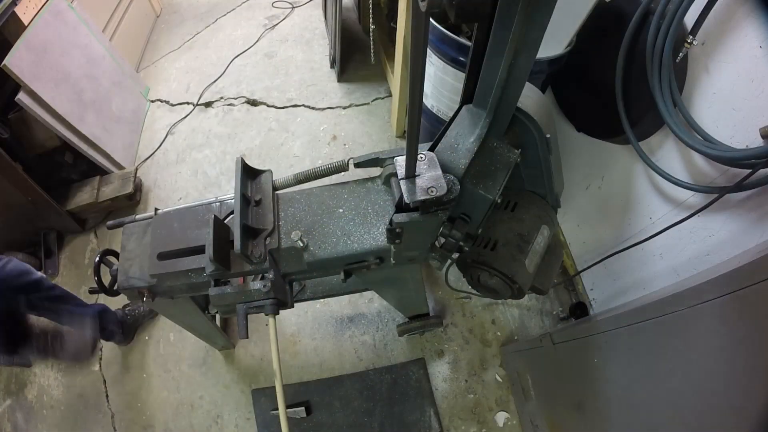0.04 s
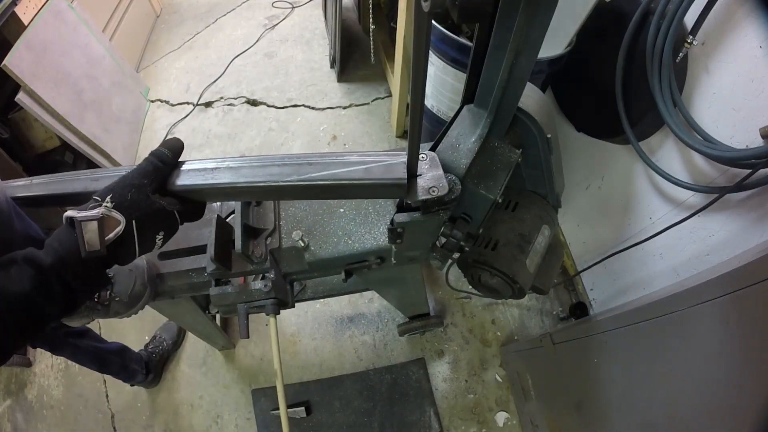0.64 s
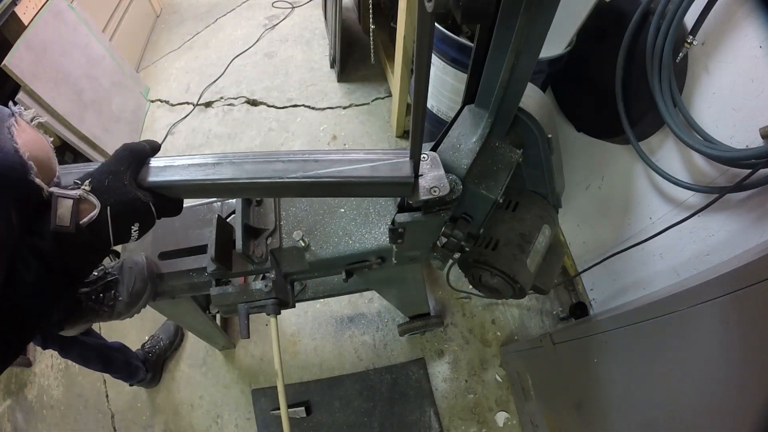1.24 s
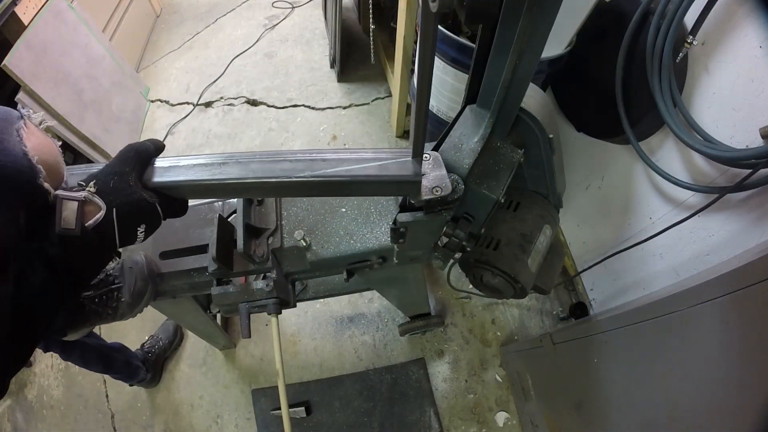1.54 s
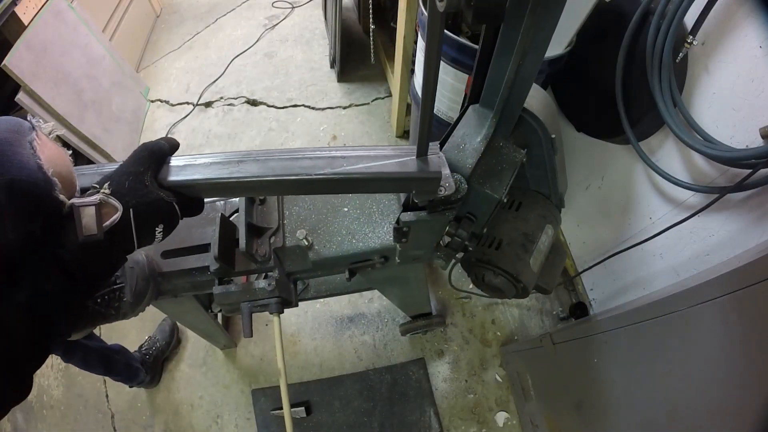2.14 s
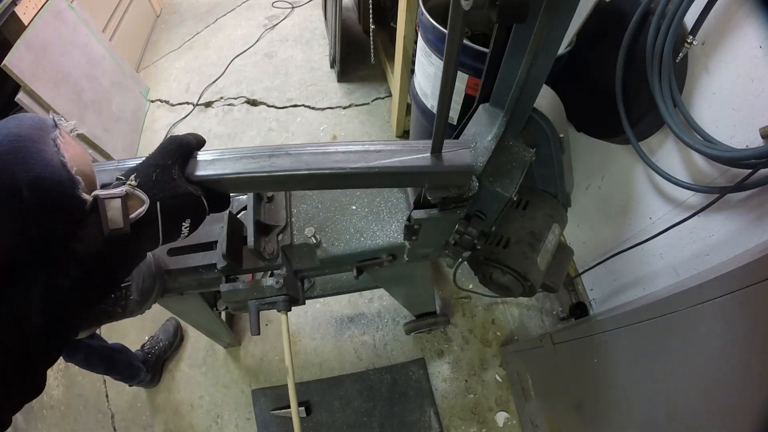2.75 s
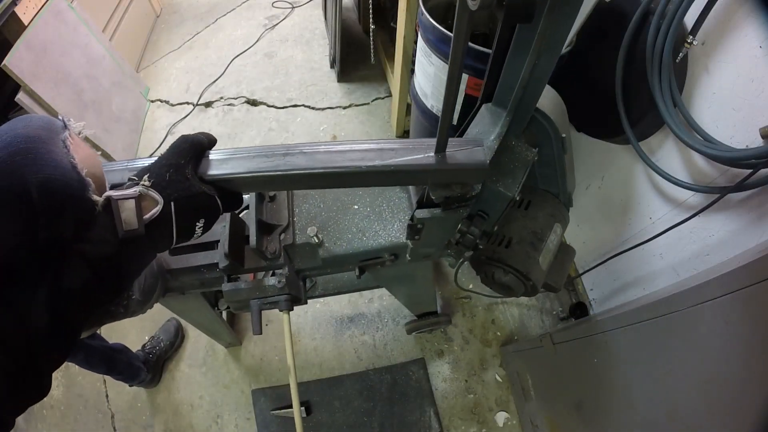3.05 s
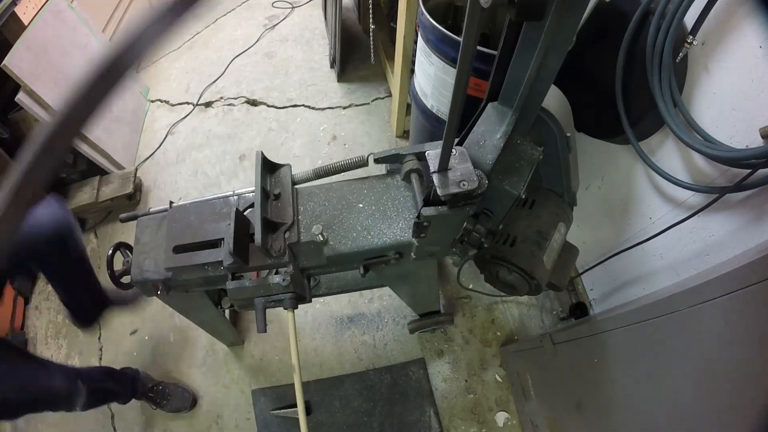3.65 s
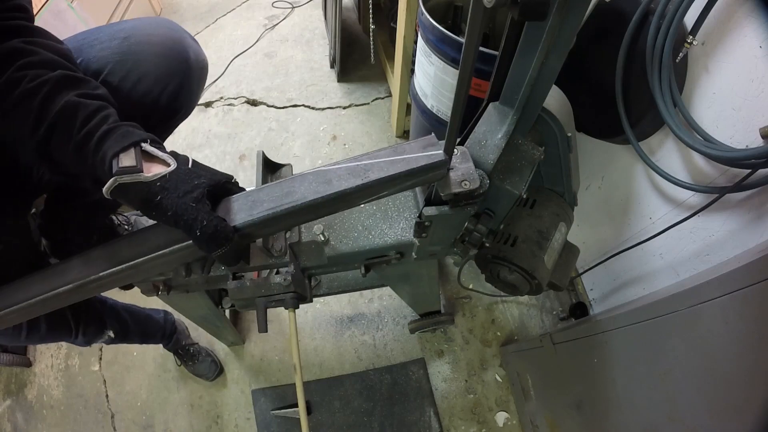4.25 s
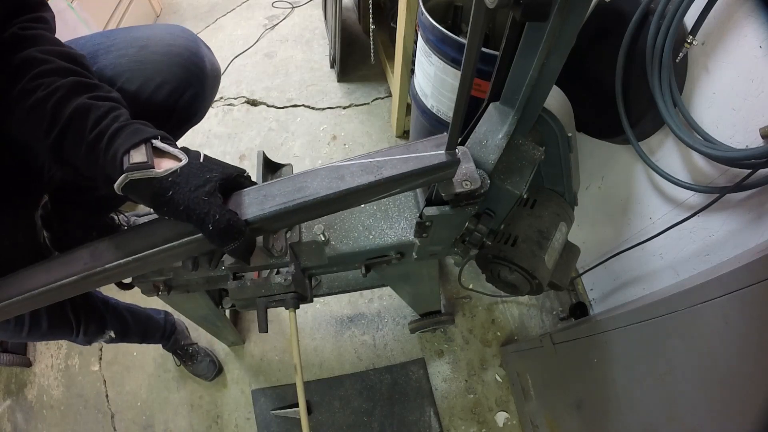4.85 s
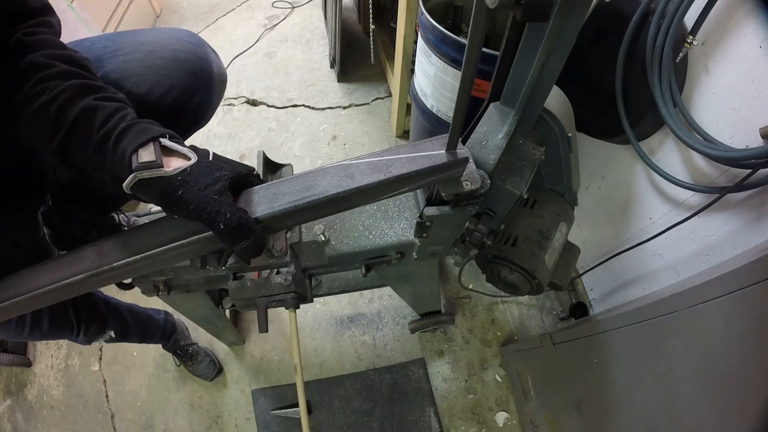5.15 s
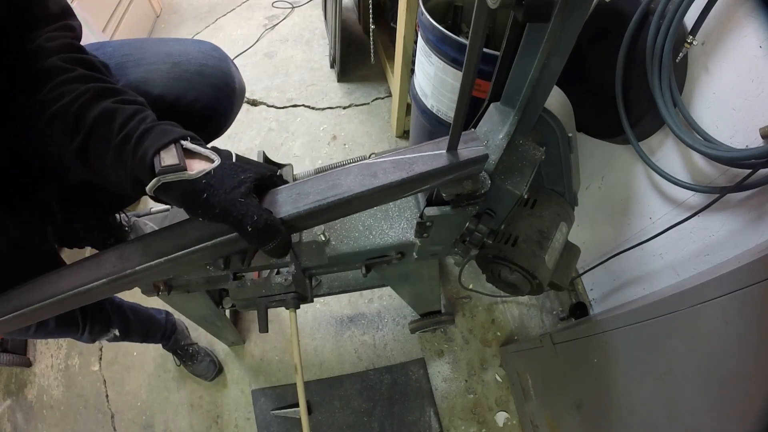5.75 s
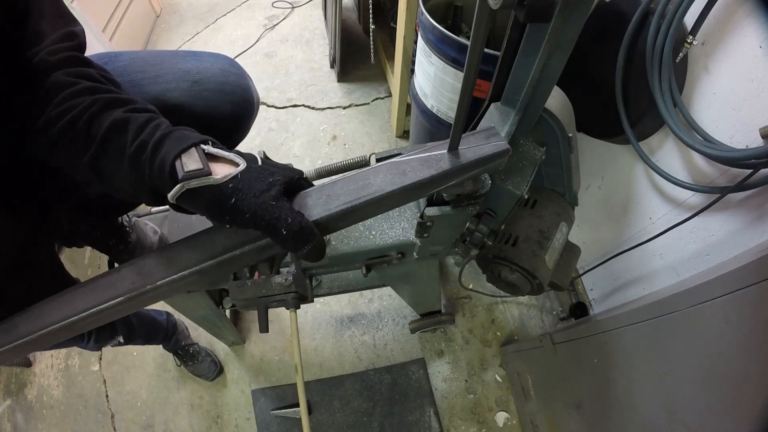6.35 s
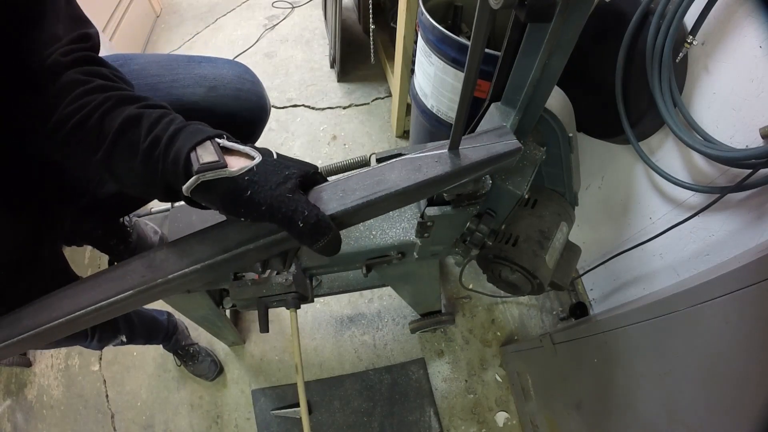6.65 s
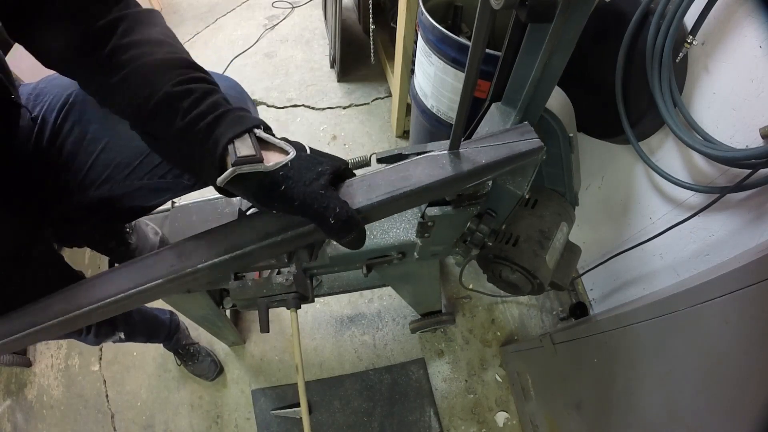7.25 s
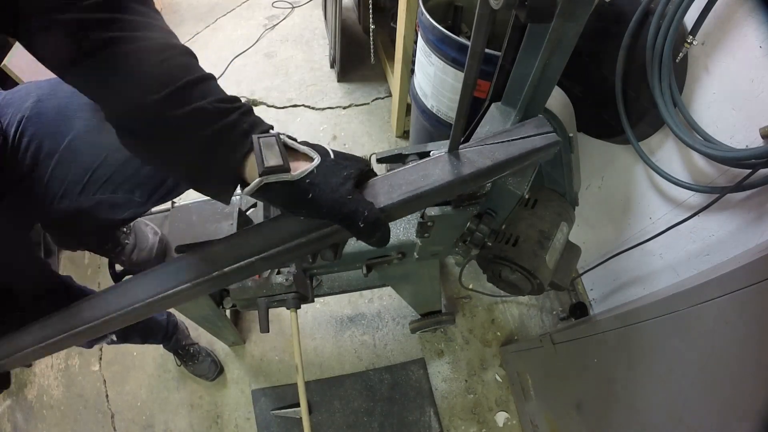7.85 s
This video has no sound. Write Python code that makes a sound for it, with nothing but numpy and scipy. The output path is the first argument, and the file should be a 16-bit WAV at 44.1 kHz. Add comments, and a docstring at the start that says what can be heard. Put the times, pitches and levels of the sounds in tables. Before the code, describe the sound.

Two screeching, rasping cuts through steel tubing on a running band saw, its motor whine and hiss continuing until an abrupt stop.

```python
"""Band saw cutting steel tube

A small workshop, close to a metal band saw, one microphone. The gear drive whines while a steel tube
is twice pushed into the blade by hand. The teeth tear chips, ringing blade and tube, and the blade's
weld bumps through the cut once a lap, about four times a second. The saw breaks off abruptly, and a
short dull rush with a rumble follows."""
import sys
import numpy as np
from scipy import signal
from scipy.fft import rfft, irfft, next_fast_len
from scipy.io import wavfile
from scipy.ndimage import uniform_filter1d, map_coordinates

SR = 44100
rng = np.random.default_rng(int(sys.argv[2]) if len(sys.argv) > 2 else 0)


def wav_out(sig):
    """Save sig, one row per channel (or a flat mono array), as 16-bit PCM at SR to the path in sys.argv[1]."""
    wavfile.write(sys.argv[1], SR, np.round(np.clip(np.atleast_2d(sig).T, -1, 1) * 32767).astype(np.int16))


N = 357033
TIME = np.arange(N) / SR
STOP_S, RUSH_S = 7.887, 7.899

# whine of the gear mesh: time_s, level_db
MESH_LEVEL = [(0, -47), (.9, -46), (1.2, -41.5), (3.1, -45), (4.5, -42), (7.9, -38.5)]
# other tones of the running drive and band: pitch_hz, width_hz, level_db
DRIVE_TONES = [(262, 90, -69), (820, 30, -63), (1650, 70, -51), (1950, 50, -59), (2401, 20, -63),
               (3601, 14, -47), (4533, 25, -53), (5249, 25, -53), (8129, 90, -55), (8780, 90, -57),
               (10950, 200, -52), (14830, 200, -50)]
# treble of the band rubbing in its guides: time_s, level_db
GUIDE_LEVEL = [(0, -31.5), (.9, -32), (3.6, -27), (4.1, -29)]
# resonances of blade, guides and tube: pitch_hz, width_hz, lift_db
STEEL_MODES = [(556,55,8),(688,19,8.5),(805,11,4.5),(1064,30,12.5),(1510,240,5.5),(2307,17,9.5),(2710,7.4,8),(3470,48,3),(3607,162,15),(3804,41,11.5),(4140,225,8.5),(4150,60,1),(4560,57,1.5),(4788,360,8.5),(6024,210,8),(6242,240,14.5),(6392,98,10),(6765,370,14.5),(7100,140,0),(7294,256,15.5),(7824,224,11.5),(8185,200,9.5),(8720,190,8.5),(9440,455,13.5),(9915,225,10),(10610,120,10.5),(11410,540,5.5),(14760,240,3.5)]
# broad colour under the resonances, running free and in each cut: frequency_hz, gain_db
IDLE_COLOUR = [(60, -32), (250, -20.5), (1000, -15), (2100, -11), (3200, -5.5), (3700, -7.5), (5500, 1),
               (7000, -12.5), (9000, -8), (11300, -5.5), (13000, -2.5), (15600, -6)]
FIRST_CUT_COLOUR = [(60, -38), (250, -32), (350, -29.5), (1000, -22.5), (1700, -17), (2100, -22.5),
                    (3700, -8.5), (4500, -7), (5500, -4), (7000, -10.5), (9000, -6.5), (11300, -4.5),
                    (13000, -9), (15600, -8.5)]
SECOND_CUT_COLOUR = [(60, -29), (250, -28), (350, -20.5), (1000, -13), (2100, -10.5), (2500, -1.5),
                     (3700, -7), (4500, -3), (5500, 0), (7000, -12), (9000, -5.5), (13000, 1.5),
                     (15600, -2.5)]
# the tube grazes the blade around the first cut, relative to full contact: time_s, level_db
TUBE_GRAZES = [(.445, -7), (.51, -5), (.565, -5), (.77, -8), (.815, -2.5), (3.485, -6), (3.57, -14)]
# teeth striking a thin edge in step: time_s, level_db, rise_s, fall_s, tooth_rate_hz
EDGE_STRIKES = [(.83, -35, .015, .015, 3630), (1.024, -22.3, .024, .02, 3630), (4.25, -22, .03, .03, 3605),
                (4.32, -18.5, .024, .02, 3590), (4.48, -23.5, .09, .05, 3595), (4.575, -23, .04, .03, 3588),
                (4.68, -27, .07, .27, 3560)]
# the tube held against the blade: start_s, end_s, attack_s, release_s
CUT_SPANS = [(.87, 3.48, 0.088, 0.066), (4.125, 7.92, .03, .02)]
# course of each cut, chatter and sizzle relative to rasp:
# time_s, rasp_db, chatter_db, sizzle_db, squeal_hz
FIRST_CUT_FEED = [(.94, -26, -6, 0.5, 3490), (1.4, -24, -10.5, -2, 4063), (2.1, -23.5, -6, 1, 4160),
                  (2.65, -23.5, -4, 5, 4820), (2.95, -22.5, -7, 0, 4750), (3.42, -21, -7, -3.5, 4810)]
SECOND_CUT_FEED = [(4.15, -28, -1, -3, 3703), (4.55, -25, -1, -3.5, 3800), (5.05, -22, 0, -4.5, 4513),
                   (5.2, -23, -2, -3.5, 4560), (5.75, -20.5, -2.5, -5, 4595), (6.25, -20, -2.5, -8, 4493),
                   (6.9, -20.5, 0, -8, 4440), (7.85, -21, -.5, -5.5, 4056)]
# the tube's thin walls screech: start_s, end_s, pitch_hz, width_hz, level_db
WALL_SCREECHES = [(.88, 1.6, 10130, 380, -29), (1.15, 2.9, 3100, 20, -45.5),
                  (1.53, 3.45, 10610, 130, -32.5), (1.55, 2.9, 11470, 520, -27.5),
                  (1.45, 2.45, 15080, 350, -36), (4.125, 4.85, 14360, 300, -32),
                  (4.85, 5.95, 14990, 240, -29.5), (5.75, 6.1, 4380, 170, -29), (6.5, 8.2, 2660, 480, -37),
                  (7, 7.95, 4180, 380, -29), (7.66, 7.92, 3650, 240, -25.5), (7.6, 7.95, 4720, 160, -26)]
# the tube snatches at the teeth and springs back: time_s, bite_db, lift_off_db
TUBE_SNATCHES = [(1.05, 3, 0), (1.298, 4, 0), (1.635, 5, 0.5), (1.958, 8, 0.5), (2.147, 1.5, -1),
                 (2.24, 4.5, 0.5), (3.485, 6.5, 0.5), (5.69, 1.5, 0), (6.255, 4, -1), (6.465, 1, 1),
                 (6.58, 0, 0.5), (6.72, -0.5, 0.5), (7.298, 4.5, 4), (7.52, 5, 0), (7.725, 7, -1)]
# colour of the weld scraping through the slot: frequency_hz, gain_db
WELD_COLOUR = [(100, -24), (350, -15), (520, 1), (900, 3), (1600, 3), (2600, 10.5), (4000, -5.5),
               (8000, -24)]
# keen stretches of the band that bite more on every lap: after_weld_s, bite_db, half_length_s
KEEN_STRETCHES = [(0.08, 1, .014), (0.182, 1.07, .013), (0.228, 0.5, 0.0196)]
# spectra of the closing rush and rumble: frequency_hz, gain_db
RUSH_COLOUR = [(200, -5), (500, -8), (1000, 1), (1800, -2), (3300, 0.5), (5500, -7), (9000, -16.5),
               (15000, -24)]
RUMBLE_COLOUR = [(20, -2), (60, -0.5), (130, -8), (210, -2.5), (320, -3), (500, -10.5), (1000, -15.5),
                 (3000, -24), (8000, -71)]


def amp(db):
    """Decibels to gain."""
    return 10 ** (np.asarray(db) / 20)


def unit(x):
    """Scale to rms 1."""
    return x / np.sqrt(np.mean(x ** 2) + 1e-20)


def colour_db(colour, hz):
    """Read a colour table on a log frequency axis."""
    points_hz, db = np.transpose(colour)
    return np.interp(np.log(hz + 1), np.log(points_hz), db)


def curves(rows):
    """One value per sample for each column after the time."""
    times, *columns = np.transpose(rows)
    return [np.interp(TIME, times, column) for column in columns]


def during(start, end, fade):
    """A gate open between two times, with its ramps inside them."""
    return np.clip(np.minimum(TIME - start, end - TIME) / fade, 0, 1)


def swell(peak_s, rise, fall):
    """A smooth rise to 1 and a fall after it."""
    return np.exp(-((TIME - peak_s) / np.where(TIME < peak_s, rise, fall)) ** 2)


def bumps(times, sizes, rise, fall):
    """A smooth bump of the given size at each time; rise and fall in seconds."""
    steps = np.arange(-SR // 10, SR // 10)
    shape = np.exp(-(steps / SR / np.where(steps < 0, rise, fall)) ** 2)
    places = np.round(times * SR).astype(int)[:, None] + steps
    heights = np.outer(sizes * np.ones(len(times)), shape)
    return np.bincount(places.ravel(), heights.ravel(), N)[:N]


def wobble(rate):
    """A smooth random curve of rms 1, with rate knots a second."""
    knots = rng.standard_normal(int(N * rate / SR) + 4)
    coarse = map_coordinates(knots, [TIME[::8] * rate])
    return unit(np.interp(TIME, TIME[::8], coarse))


def filtered(x, response):
    """Shape x by a gain that depends on frequency."""
    size = next_fast_len(N + 8192)
    return irfft(rfft(x, size) * response(np.fft.rfftfreq(size, 1 / SR)), size)[..., :N]


def noise(colour):
    """Noise of rms 1 with the given spectrum."""
    return unit(filtered(rng.standard_normal(N), lambda hz: amp(colour_db(colour, hz))))


def phase(hz):
    """Running phase of a steady or gliding frequency."""
    return 2 * np.pi * np.cumsum(hz * np.ones(N)) / SR


def ringing(hz, width):
    """A randomly driven resonance of rms 1, free to glide."""
    turn = phase(hz)
    return unit(wobble(width) * np.cos(turn) + wobble(width) * np.sin(turn))


def gear_drive(welds):
    """The gear mesh whines, dipping as the weld loads it; cutting damps the other tones."""
    load = bumps(welds + 0.015, rng.rayleigh(size=len(welds)), rise=0.024, fall=0.038)
    mesh_hz = 1200 + 1.1 * wobble(10)
    sag_db = .8 * wobble(14) - 3.5 * load
    whine = amp(curves(MESH_LEVEL)[0] + sag_db) * np.sin(phase(mesh_hz))
    side_tone = amp(-51.5 + 1.2 * wobble(12)) * np.sin(phase(1101 + 2 * wobble(25)))
    tones = sum(amp(db) * ringing(hz, width) for hz, width, db in DRIVE_TONES)
    cutting = during(0.95, 3.36, fade=0.25) + during(4.26, 8.1, fade=0.14)
    return whine + amp(-5 * cutting) * (side_tone + tones)


def steel(colour, hz):
    """Gain of the steel's resonances on top of a broad colour."""
    peaks_db = sum(db / (1 + (2 * (hz - centre) / width) ** 2) for centre, width, db in STEEL_MODES)
    return amp(colour_db(colour, hz) + peaks_db)


def friction(scatter_db, clump_db, clump_rate):
    """Friction noise: chips of uneven size scatter its level, teeth biting together clump it."""
    return rng.standard_normal(N) * amp(scatter_db * wobble(2400) + clump_db * wobble(clump_rate))


def frame_and_guides():
    """The running band rubs: a dull drone from the frame, treble from the guides."""
    grit = friction(scatter_db=0, clump_db=0.87, clump_rate=200)
    rub = unit(filtered(grit, lambda hz: steel(IDLE_COLOUR, hz)))
    drone = filtered(rub, lambda hz: 1 / (1 + (hz / 2200) ** 8))
    return amp(-49) * unit(drone) + amp(curves(GUIDE_LEVEL)[0] - 0.46) * (rub - drone)


def band_ping():
    """The idling band rings out once in its guides."""
    return amp(-40) * swell(peak_s=.39, rise=.022, fall=.022) * np.sin(phase(hz=1655))


def grazes():
    """Brief, light contact as the tube brushes the blade."""
    times, db = np.transpose(TUBE_GRAZES)
    return bumps(times, amp(db), rise=0.02, fall=0.025)


def stick_slip(rate, scatter):
    """Pressure builds up and lets go at uneven moments; rms 1."""
    cycle = np.cumsum(rate * np.exp(scatter * wobble(rate))) / SR
    sizes = rng.rayleigh(size=int(cycle[-1]) + 1)
    ramps = (cycle % 1 - .5) * sizes[cycle.astype(int)]
    return unit(uniform_filter1d(ramps, size=90))


def chip_bands(colour):
    """Torn chips ring the steel; four bands from body to sizzle, each of rms 1."""
    def response(hz):
        edges_hz = np.array([[3200], [5500], [10200]])
        lowpasses = 1 / (1 + (hz / edges_hz) ** 40)
        return steel(colour, hz) * np.diff(lowpasses, axis=0, prepend=0, append=1)

    grit = friction(scatter_db=1, clump_db=1.5, clump_rate=420)
    return map(unit, filtered(grit, response))


def blade_squeals(pitch_hz, judder, lower_db, upper_db):
    """The blade's two lowest squeals tighten as the teeth bite, the upper following the lower."""
    lower_hz = pitch_hz + 20 * judder
    upper_hz = 3500 + .75 * lower_hz
    lower = amp(lower_db + 2.6 * wobble(28)) * ringing(lower_hz + 150 * wobble(45), width=380)
    upper = amp(upper_db + 2.8 * wobble(28)) * ringing(upper_hz + 160 * wobble(45), width=480)
    return lower + upper


def cut(span, feed, welds, colour, body_db, chatter_db, rasp_db, sizzle_db,
        squeal_db, upper_db, judder_db, bite_db, lift_db):
    """The teeth tear through the hand-held tube, which judders, snatches and springs back."""
    rasp, chatter, sizzle, squeal_hz = curves(feed)
    snatch_s, snatch_db, spring_db = np.transpose(TUBE_SNATCHES)
    snatches = bumps(snatch_s, snatch_db, rise=0.014, fall=0.00943)
    spring_back = bumps(snatch_s + 0.031, spring_db, rise=0.0145, fall=.03)
    force_db = lap_force(welds, bite_db, lift_db) - spring_back
    judder = .7 * force_db + judder_db * stick_slip(rate=24, scatter=.4) + snatches
    force_db += 0.55 * stick_slip(rate=37, scatter=0.54)
    body, low, mid, top = chip_bands(colour)
    # judder sways the chatter most and the fine sizzle hardly at all
    sound = amp(rasp + body_db + 0.63 * judder) * body
    sound += amp(rasp + chatter + chatter_db + judder) * low
    sound += amp(rasp + rasp_db + 0.65 * judder) * mid
    sound += amp(rasp + sizzle + sizzle_db + 0.077 * judder) * top
    sound += amp(rasp + 0.46 * judder) * blade_squeals(squeal_hz, judder, squeal_db + chatter, upper_db)
    sound += amp(judder) * wall_screeches(*span[:2])
    return sound * amp(force_db)


def workshop(x, wet_db, t60_s):
    """Floor, walls and clutter close to the microphone return a short, dense answer."""
    t = np.arange(SR // 4) / SR
    tail = rng.standard_normal(len(t)) * amp(-60 * t / t60_s) * (t > .003)
    return x + amp(wet_db) * signal.fftconvolve(x, tail / np.linalg.norm(tail))[:N]


def tooth_tone():
    """On the tube's corner the teeth strike singly and sing at their own rate; uneven teeth rasp."""
    tooth_hz = curves(EDGE_STRIKES)[-1]
    level = sum(amp(db) * swell(peak_s, rise, fall) for peak_s, db, rise, fall, _ in EDGE_STRIKES)
    turn = phase(tooth_hz + 14 * wobble(120))
    tone = np.sin(turn) + amp(-30) * np.sin(2 * turn)
    rasp = amp(-13) * ringing(tooth_hz - 100, width=300)
    stutter_db = 1.6 * wobble(70) + 1.8 * stick_slip(rate=16, scatter=.3)
    return level * amp(2.6 + stutter_db) * (tone + rasp)


def contact(start, end, attack, release):
    """The tube is eased onto the blade, held there and drawn off."""
    return np.clip(np.minimum((TIME - start) / attack, (end - TIME) / release), 0, 1)


def wall_screeches(cut_start, cut_end):
    """Resonances of the thin walls swell and fade while the teeth work on them."""
    sound = np.zeros(N)
    for start, end, hz, width, db in WALL_SCREECHES:
        if cut_start < (start + end) / 2 < cut_end:
            arch = np.sqrt(during(start, end, fade=(end - start) / 2))
            sound += amp(db) * arch * ringing(hz, width)
    return sound


def weld_times(first_s, lap_s, lengthening_s, end_s):
    """The weld comes round once a lap until the cut ends; the loaded band slows a little."""
    laps = np.arange(int((end_s - first_s) / lap_s) + 1)
    times = first_s + lap_s * laps + lengthening_s * laps ** 2 / 2
    return times[times < min(end_s, STOP_S)]


def lap_force(welds, bite_db, lift_db):
    """Tooth force in dB: the weld bites and throws the tube off, then the keen stretches follow."""
    bite = bumps(welds, bite_db, rise=.017, fall=.024)
    lift_off = bumps(welds + 0.0323, lift_db, rise=.015, fall=.025)
    keen = sum(bumps(welds + after, db, rise=half, fall=half) for after, db, half in KEEN_STRETCHES)
    return bite - lift_off + keen


def weld_knocks(welds, first_db, per_lap_db):
    """The thick weld scrapes through the slot and shakes the saw table."""
    level_db = first_db + per_lap_db * np.arange(len(welds))
    grit = friction(scatter_db=0, clump_db=1, clump_rate=370)
    scrape = unit(filtered(grit, lambda hz: steel(WELD_COLOUR, hz)))
    return bumps(welds + 0.0056, amp(level_db), rise=0.015, fall=0.012) * scrape


def closing_rush():
    """A soft burst whose hiss falls quickly to a faint floor over a slower-fading rumble."""
    age = np.maximum(TIME - RUSH_S, 0)
    hiss = noise(RUSH_COLOUR) * (amp(-33 - 204 * age) + amp(-50))
    rumble = noise(RUMBLE_COLOUR) * amp(-36.5 - 25 * age)
    return (hiss + rumble) * np.clip(age / 0.0071, 0, 1)


def scene():
    """From beside the saw: two cuts, then the rush, alike in both channels."""
    span1, span2 = CUT_SPANS
    welds1 = weld_times(first_s=1.0495, lap_s=.2508, lengthening_s=.00093, end_s=span1[1])
    welds2 = weld_times(first_s=4.33, lap_s=.25534, lengthening_s=.00037, end_s=span2[1])
    first = cut(span1, FIRST_CUT_FEED, welds1, FIRST_CUT_COLOUR,
                body_db=-22.5, chatter_db=0.3, rasp_db=-1.16, sizzle_db=-2.2,
                squeal_db=-9, upper_db=-11, judder_db=1, bite_db=3, lift_db=0.84)
    second = cut(span2, SECOND_CUT_FEED, welds2, SECOND_CUT_COLOUR,
                 body_db=-20.5, chatter_db=-5.5, rasp_db=-1.6, sizzle_db=1.8,
                 squeal_db=-6.5, upper_db=-8.5, judder_db=1.5, bite_db=1.5, lift_db=2.6)
    cuts = first * (contact(*span1) + grazes()) + second * contact(*span2)
    knocks = weld_knocks(welds1, first_db=-35.5, per_lap_db=-0.02)
    knocks += weld_knocks(welds2, first_db=-38.5, per_lap_db=0.66)
    cutting = workshop(cuts + knocks, wet_db=-9, t60_s=0.044)
    machine = gear_drive(np.concatenate([welds1, welds2])) + frame_and_guides() + band_ping()
    saw = (machine + cutting + tooth_tone()) * during(0, STOP_S, fade=0.00051)
    return np.tile(saw + closing_rush(), (2, 1))


def record(dry):
    """The camera's microphone rounds off the highest peaks and keeps nothing above its band limit."""
    ceiling, top_hz = .75, 15750
    rounded = dry / (1 + (dry / ceiling) ** 6) ** (1 / 6)
    return filtered(rounded, lambda hz: hz < top_hz)


dry = scene()
out = record(dry)
wav_out(out)
```